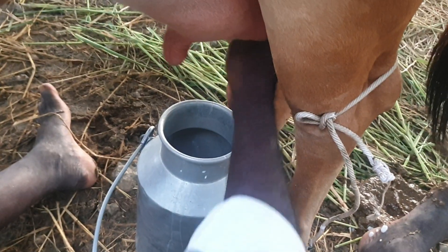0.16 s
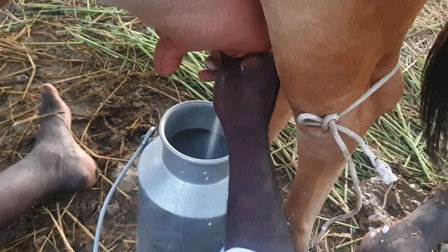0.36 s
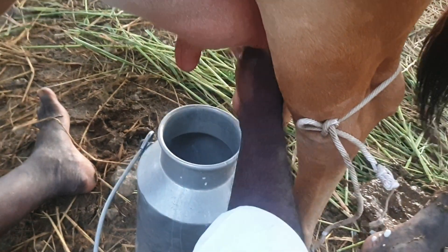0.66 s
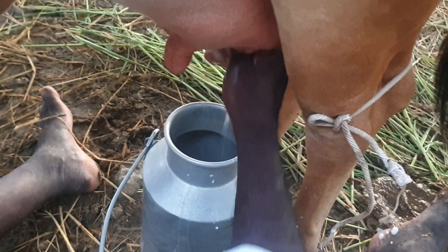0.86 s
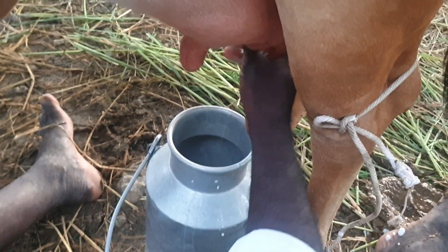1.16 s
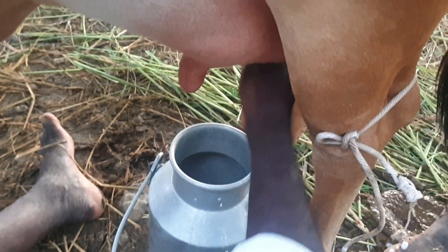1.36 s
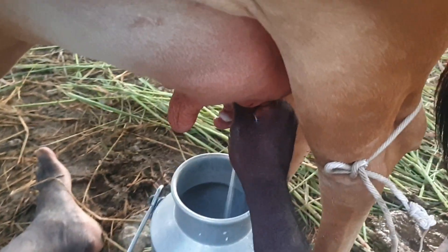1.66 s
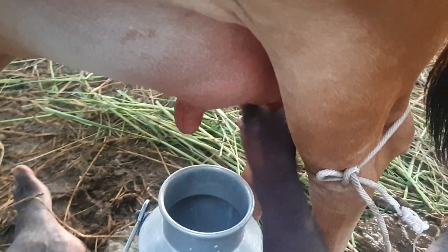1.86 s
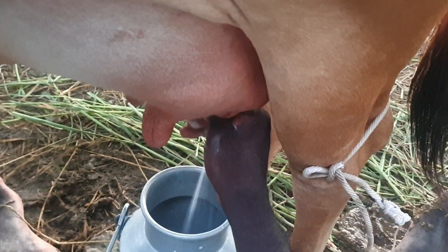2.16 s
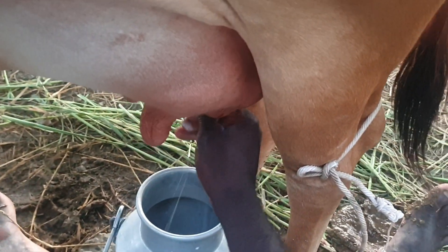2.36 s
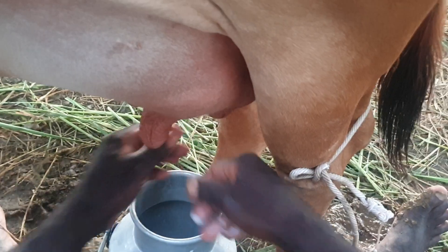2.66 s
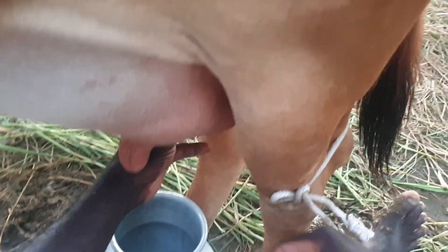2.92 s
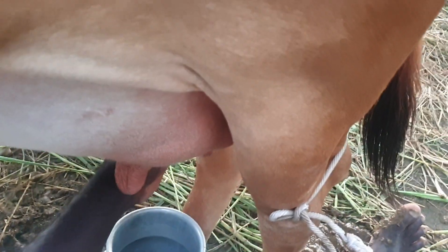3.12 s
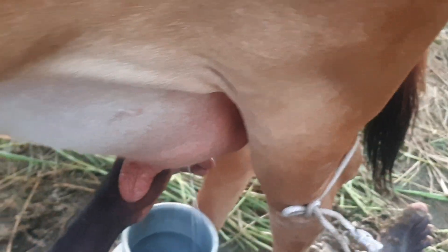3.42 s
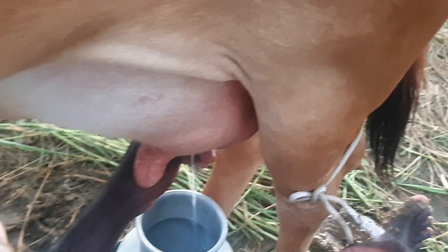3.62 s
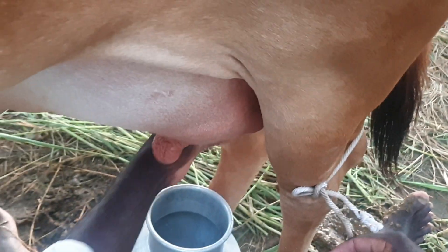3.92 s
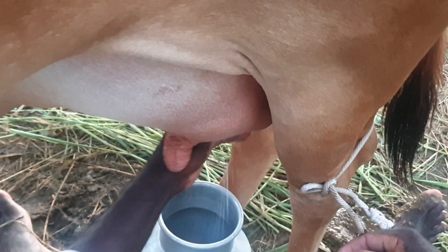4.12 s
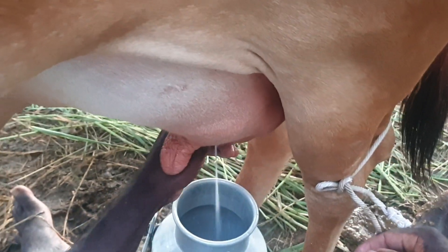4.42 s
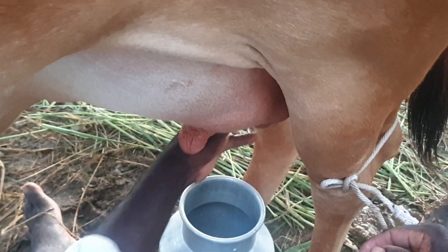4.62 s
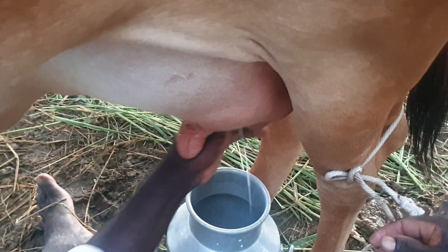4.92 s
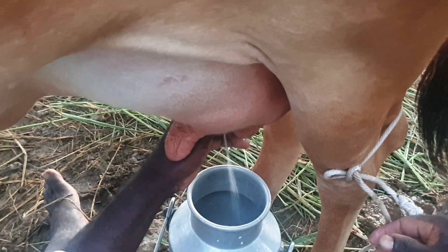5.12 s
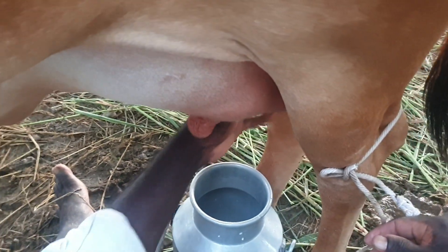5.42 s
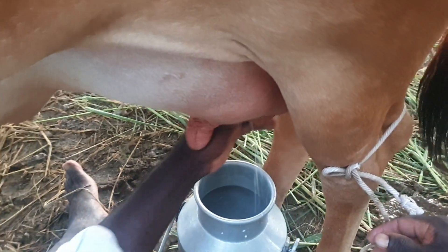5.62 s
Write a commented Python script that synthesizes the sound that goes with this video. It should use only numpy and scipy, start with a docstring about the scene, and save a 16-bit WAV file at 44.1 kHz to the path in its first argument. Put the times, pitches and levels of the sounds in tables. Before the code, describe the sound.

Jets of milk spurt into a metal can close to the microphone from the start, about two a second with short gaps, each a ringing patter with a hiss of spray and a little slosh. At about 0.6 seconds a finger knocks the microphone with a sharp thump, the loudest moment. The can's handle clinks lightly at 1.4 seconds. Insects sing steadily over a low outdoor rumble, with faint bird chirps scattered through the first four seconds. From about 2.4 seconds a distant engine chugs in, swelling and then speeding up around 4 seconds. The milking pauses briefly near 3 seconds, resumes at 3.5 and is strongest between 4.3 and 5.4. From 4.5 seconds the cow gives a soft, humming low that lasts to the end, near 5.8 seconds, with a thin whistle-like overtone rising above it from about 5 seconds.

```python
"""A cow is milked by hand in the open, with insects singing over a low rumble and birds calling.
From the start, jets of milk drum into a metal can and spray hisses off them. In the first second a
finger knocks the phone beside its left microphone port; then the can's handle clinks. A far engine
chugs in, draws closer and speeds up. Near the end, over more spurts, the cow lows and a thin,
whistle-like overtone rises above her hum."""
import sys
import numpy as np
from scipy import signal
from scipy.fft import rfft, irfft
from scipy.io import wavfile
from scipy.ndimage import uniform_filter1d

SR = 44100
rng = np.random.default_rng(int(sys.argv[2]) if len(sys.argv) > 2 else 0)


def int16_out(signal):
    """Quantize to a 16-bit WAV file."""
    q = np.round(np.clip(np.atleast_2d(signal).T, -1, 1) * 32767)
    wavfile.write(sys.argv[1], SR, q.astype(np.int16))


N = 254898
TIME = np.arange(N) / SR

# The two microphone ports. Each row: frequency in Hz, left minus right in dB for far sounds,
# the same for the nearby can, likeness from 0 to 1.
PORTS = [(60.5, 2.5, 2.5, .9), (203, 3.5, 3, 0.95), (391, 10.5, 8.5, 0.7), (1300, 7.5, 10.5, 0.2),
         (2400, 14, 8, 1), (4400, -2.5, 0.5, 0), (7250, -16.5, -6.5, 0.1), (8250, -18.5, -8, 0.05),
         (11060, -6.5, 1.5, 0), (15000, -2, -9.5, 0.05)]
# Faders of the background bed. Each row: time in seconds, then rumble, midrange hiss and insects in dB.
BED_LEVELS = [(0.0, -53, -61, -62.5), (0.14, -55.5, -73.5, -62), (0.53, -53.5, -60.5, -65),
              (0.76, -60, -76.5, -68), (1.56, -62.5, -77, -65), (1.82, -58.5, -76, -64),
              (2.75, -57, -77.5, -66), (3.25, -55.5, -74.5, -59.5), (3.72, -54, -65.5, -60),
              (4.12, -53, -75.5, -63), (4.33, -46.5, -62, -59), (4.49, -53, -52, -65),
              (4.65, -55.5, -78, -59.5), (5.07, -53.5, -69, -60.5), (5.55, -55.5, -68.5, -60),
              (5.78, -52.5, -64.5, -58.5)]
# Tone colours of the bed. Each row: frequency in Hz, relative spectral level in dB.
RUMBLE_EQ = [(15, -41), (25, -20.5), (49, -1.5), (92, -2.5), (202, -13.5), (246, -18.5), (485, -33),
             (600, -44), (780, -63), (1320, -120)]
MID_HISS_EQ = [(450, -7.5), (600, -8.5), (900, -11), (1530, -6), (2000, -8), (2500, -2), (3200, -12),
               (4400, -16), (6500, -22.5), (9000, -25)]
INSECT_EQ = [(4500, -28), (4850, -9.5), (5350, 0), (5650, -2.5), (6100, -20), (6600, -56), (7700, -22.5),
             (8250, -8.5), (8700, -23), (9800, -23.5), (10700, -14.5), (11500, -30.5)]
MIC_HISS_EQ = [(6000, -5.5), (9000, -5), (12000, 0), (16500, -3.5)]
# Exhaust pipe modes. Each row: frequency in Hz, time to fade 60 dB in seconds, gain in dB.
PIPE_MODES = [(84, 0.21, -13), (154, 0.055, -6), (231, 0.03, 4), (281, 0.061, -10)]
# Short bird notes. Each row: start and length in seconds, first and last pitch in Hz, level in dB.
CHIRPS = [(.16, .09, 4320, 4230, -74), (.7, .1, 2460, 2250, -78), (1.25, .09, 4600, 3800, -75),
          (1.9, .15, 2480, 2360, -79), (1.96, .07, 4270, 4180, -75), (2., .045, 4850, 4600, -73),
          (3.325, .04, 2460, 2760, -68), (3.365, .065, 2520, 2320, -68), (3.365, .1, 4880, 3900, -68),
          (3.62, .035, 2800, 2950, -69), (3.655, .075, 2620, 2500, -67), (4.02, .12, 2500, 2420, -70)]
COOS = [(3.17, 0.092, 464, 520, -69), (4.09, 0.112, 443, 495, -68.5)]
# The cow's low. Each row: time in seconds, pitch in Hz, level in dB, mouth opening in dB.
MOO = [(4.5, 147.2, -60, -30), (4.6, 155.5, -57.5, -37), (4.7, 166.5, -60, -19),
       (4.89, 168.4, -55.5, -14.5), (5.02, 173.4, -61, -7), (5.37, 170.1, -56.5, -8.5),
       (5.56, 169.6, -57, -12.5), (5.62, 176.6, -64.5, 0), (5.78, 170.7, -62, -7)]
# Colour of her open mouth. Each row: frequency in Hz, gain in dB.
MOUTH_EQ = [(500, -76), (860, 2), (1030, -9), (1200, -5), (1500, -28), (2000, -18), (2500, -9)]
# The thin overtone above her low. Each row: time in seconds, pitch in Hz, level in dB.
OVERTONE = [(4.95, 1690, -78.5), (5.05, 1834, -65.5), (5.13, 1960, -61), (5.2, 2095, -60.5),
            (5.33, 2010, -55), (5.45, 2090, -54.5), (5.54, 2119, -58.5), (5.62, 1990, -75)]
# Finger knocks. Each row: time in seconds, dip level in dB and width in ms, click level in dB,
# swing level in dB, pitch in Hz and length in ms, left minus right in dB.
KNOCKS = [(0.0615, -28.5, 0.31, -46, -30, 69, 17, 5.5), (.2315, -34.5, 1., -53, -54, 60, 15, 17),
          (0.615, -41, 0.55, -26.5, -34.5, 150, 13, 8), (.62735, -1, .24, -21, -7.3, 45, 20, 33),
          (0.6566, -21.5, 0.14, -30, -36, 62.4, 11, 10)]
# Handle modes. Each row: frequency in Hz, gain in dB, time to fade 60 dB in seconds.
HANDLE_MODES = [(1290, -13, 0.38), (1500, -8.5, 0.19), (2070, -12.5, 0.42), (2476, -11, 0.23),
                (2790, -5.5, 0.38), (3400, -19.5, 0.26), (3880, -29, 0.24)]
# Handle clinks and fine spits of spray. Each row: start in seconds, level in dB.
CLINKS = [(1.391, -55.5)]
SPITS = [(0.0765, -35.5), (0.3391, -40), (0.9901, -43), (3.489, -46), (3.8367, -41), (4.305, -34.5),
         (4.529, -26), (4.572, -26.5), (4.6422, -42), (5.118, -36), (5.1706, -36), (5.215, -30),
         (5.2944, -45)]
# The can's wall modes. Each row: frequency in Hz, bandwidth in Hz, gain in dB.
CAN_MODES = [(1266, 12, -0.5), (1655, 190, 1), (1893, 150, 6), (2390, 87, 7), (2966, 33, 1), (3700, 200, 5),
             (4300, 640, 12.5)]
# Heavy drops on the can. Each row: start in seconds, level in dB, strongest ring in Hz.
SPLATS = [(0.051, -40, 2980), (0.062, -38.5, 2770), (0.138, -41.5, 1290), (0.3565, -59, 3700),
          (0.3806, -47, 1790), (0.5019, -38, 1800), (0.541, -47, 1720), (0.9782, -38.5, 4370),
          (1.115, -46, 1260), (1.2221, -41.5, 1056), (1.6862, -40, 3580), (1.7508, -41, 2370),
          (2.2981, -43.5, 2320), (2.3984, -48.5, 4000), (3.5466, -44.5, 1280), (4.35, -37.5, 5200),
          (4.361, -32, 4300), (4.371, -36, 2950), (4.392, -35.5, 1960), (4.4112, -34.5, 2980),
          (4.4519, -32.5, 1320), (4.466, -38, 2780), (4.4705, -29, 2900), (4.4849, -29.5, 1230),
          (4.492, -32, 2780), (4.519, -36, 1220), (4.563, -43, 2980), (5.149, -45, 1330),
          (5.2127, -35, 2070), (5.2211, -26.5, 2040), (5.2924, -33.5, 1880), (5.3261, -34, 1210),
          (5.7173, -38, 690), (5.7588, -36.5, 770)]
# Tone colours of the milk. Each row: frequency in Hz, relative spectral level in dB.
SPLASH_EQ = [(780, -36), (900, -28), (1150, -0.5), (1900, -23), (2120, -2.5), (2350, -6), (2800, -3),
             (3300, -4.5), (3700, -21.5), (4800, 1.5), (5600, 5.5), (6300, -4), (7800, -15), (8600, -18)]
SPRAY_EQ = [(7000, -9), (8300, -10), (10000, -5.5), (13300, 2), (16500, 0.5)]
SLOSH_EQ = [(150, -10.5), (250, -2), (500, 1), (800, -10), (1000, -32.5)]
# Spurts of milk. Each row: moment of full flow, rise, hold and fall in seconds, spray level in dB,
# then drumming and slosh in dB relative to the spray.
SPURTS = [(.0, .01, .06, 0.038, -68, 1, 9.5), (0.075, 0.041, 0.065, 0.021, -55, 2.5, -2),
          (0.223, .03, 0.07, .08, -69, 3, -3), (.365, 0.043, 0.15, 0.12, -51, 3, -3),
          (0.919, 0.014, .05, 0.046, -65, 0.5, 0), (0.972, 0.022, .16, 0.098, -60, 5.5, -10),
          (1.205, .012, 0.033, 0.069, -73, 7.5, 6.5), (1.402, 0.035, 0.049, 0.071, -72, 4.5, -23),
          (1.543, 0.02, 0.028, .04, -67, 0.5, -4), (1.61, 0.03, 0.19, 0.076, -60.5, 4, -5),
          (2.243, 0.072, 0.085, 0.07, -58, 2.5, -5.5), (2.366, 0.059, 0.038, 0.043, -61.5, 3, -8),
          (2.713, 0.053, 0.071, 0.13, -71.5, 3, 4), (3.498, 0.016, 0.047, 0.072, -64.5, 0.5, -1),
          (3.676, 0.12, 0.1, .05, -63, -3.5, 2), (3.828, 0.074, 0.049, 0.094, -61.5, 2.5, 0),
          (4.316, 0.057, 0.13, .08, -56.5, 0, -3.5), (4.449, 0.11, 0.14, 0.13, -52.5, 4.5, -6.5),
          (5.006, .015, 0.082, 0.042, -64, 1, 6.5), (5.118, 0.013, 0.036, .04, -55.5, 6, -25),
          (5.166, 0.024, 0.12, 0.18, -51.5, 3.5, -2.5), (5.616, 0.016, .07, .06, -67, 6, 4),
          (5.743, 0.059, 0.049, 0.078, -66, 8, 9)]


def undb(db):
    return 10 ** (np.asarray(db) / 20)


def unit(x):
    return x / np.sqrt(np.mean(x ** 2))


def curves(rows):
    """Columns of a table joined by straight lines in time."""
    times, *columns = np.transpose(rows)
    return [np.interp(TIME, times, column) for column in columns]


def on_hz(rows, hz, column=1):
    """One column of a table read on a log-frequency axis."""
    rows = np.array(rows)
    return np.interp(np.log(hz + 1), np.log(rows[:, 0]), rows[:, column])


def colour(x, eq):
    """Apply an EQ curve, silent beyond its ends; RMS 1."""
    hz = np.fft.rfftfreq(N, 1 / SR)
    inside = (hz > eq[0][0]) & (hz < eq[-1][0])
    return unit(irfft(rfft(x) * undb(on_hz(eq, hz)) * inside, N))


def ring(x, hz, t60):
    """One mode: a decaying sine for every push."""
    r, turn = np.exp(-np.log(1000) / (t60 * SR)), 2 * np.pi * hz / SR
    return signal.lfilter([0, r * np.sin(turn)], [1, -2 * r * np.cos(turn), r * r], x)


def ring_time(width_hz):
    """Seconds for a mode of this bandwidth to fade 60 dB."""
    return np.log(1000) / np.pi / width_hz


def walk(rate):
    """Smooth random drift, rate new values a second; RMS 1."""
    hold = int(SR / rate)
    steps = np.repeat(rng.standard_normal(N // hold + 1), hold)
    return unit(uniform_filter1d(uniform_filter1d(steps, hold), hold)[:N])


def patter(rate, scatter_db):
    """Random clicks of either sign; a few are much bigger than the rest."""
    hit = rng.random(N) < rate / SR
    return hit * rng.standard_normal(N) * undb(scatter_db * rng.exponential(size=N))


def ports(make, wide, near):
    """Two ports of unlike colour hear nearly the same bass but mostly their own treble."""
    hz = np.fft.rfftfreq(N, 1 / SR)
    like = np.clip(1 - wide * (1 - on_hz(PORTS, hz, column=3)), 0, 1)
    mid, side = rfft(make()) * np.sqrt(1 + like), rfft(make()) * np.sqrt(1 - like)
    tilt = undb(on_hz(PORTS, hz, column=2 if near else 1) / 2)
    norm = 2 / (tilt + 1 / tilt) / np.sqrt(1 + like)
    return irfft(np.array([(mid + side) * tilt, (mid - side) / tilt]) * norm, N)


def pan(x, left_db):
    return x * undb(np.array([[left_db], [-left_db]]) / 2)


def add(out, start, sound):
    i = int(start * SR)
    out[:, i:i + sound.shape[1]] += sound[:, :N - i]


def background_bed():
    """Rumble, shimmering insects, microphone hiss and a faint midrange hiss that swells with spurts."""
    shimmer_db = 1.5 * walk(6), 1.5 * walk(8), 1.2 * walk(12)
    gains = undb(np.array(curves(BED_LEVELS)) + shimmer_db)
    layers = [*zip((RUMBLE_EQ, MID_HISS_EQ, INSECT_EQ), gains), (MIC_HISS_EQ, undb(-79))]

    def bed():
        return sum(colour(rng.standard_normal(N), eq) * gain for eq, gain in layers)
    return ports(bed, wide=1, near=False)


def far_engine(start=2.37, idle_hz=13.02, fast_hz=16.2, speed_up_s=(3.75, 4.7)):
    """Each firing of a slow single cylinder thumps the pipe, a little uneven in force and timing."""
    since = np.maximum(TIME - start, 0)
    cycles = np.cumsum(np.interp(TIME, speed_up_s, (idle_hz, fast_hz)) * (since > 0)) / SR
    level_db = -47.5 - 16.5 * np.exp(-since / .86)  # swells as it closes in
    fired = np.flatnonzero(np.diff(np.floor(cycles)))
    timing, force = rng.standard_normal((len(fired), 2)).T
    jittered = np.clip(fired + (.003 * SR * timing).astype(int), 0, N - 1)
    pushes = np.zeros(N)
    pushes[jittered] = undb(level_db[fired] + 2.5 * force)
    puffs = np.convolve(pushes, np.hanning(130) / 65)[:N]  # softened to 3 ms
    return pan(sum(undb(db) * ring(puffs, hz, t60) for hz, t60, db in PIPE_MODES), left_db=4.6)


def bird_note(start, length, first_hz, last_hz, db, bend=1.5, arch_db=6):
    """Time, pitch and level rows of one note: it glides fastest late and is loudest in the middle."""
    progress = np.linspace(0, 1, num=9)
    hz = first_hz + (last_hz - first_hz) * progress ** bend
    return np.transpose([start + length * progress, hz, db - arch_db * (2 * progress - 1) ** 2])


def birds_and_cow_overtone():
    """Near-sine tones blurred by echoes: raspy chirps, soft coos and a thin overtone over the low."""
    calls = [(OVERTONE, .35)]
    calls += [(bird_note(*row), .75) for row in CHIRPS]
    calls += [(bird_note(*row), .25) for row in COOS]
    out, waver, rasp = 0, walk(120), walk(300)
    for call, rough in calls:
        hz, db = curves(call)
        gate = np.clip(np.minimum(TIME - call[0][0], call[-1][0] - TIME) / .0013, 0, 1)
        tone = np.sqrt(2) * np.sin(2 * np.pi * np.cumsum(hz * (1 + .02 * rough * waver)) / SR)
        left_db = 2.5 if call is OVERTONE else on_hz(PORTS, call[1][1])
        out = out + pan(gate * undb(db) * (1 + rough * rasp) * tone, left_db)
    echoes = rng.standard_normal((2, 3000)) * undb(-60 * TIME[:3000] / .15)
    return out + undb(-30) * signal.fftconvolve(out, echoes, axes=1)[:, :N]


def cow():
    """A low hum; upper partials, a little hoarse, come out as the mouth opens."""
    hz, level_db, mouth_db = curves(MOO)
    phase = 2 * np.pi * np.cumsum(hz * (1 + .007 * walk(30))) / SR
    hum = np.sin(phase) + undb(-18.5) * np.sin(2 * phase)
    upper = sum(undb(on_hz(MOUTH_EQ, k * hz) + 2.8 * walk(13)) * np.sin(k * phase) for k in range(3, 13))
    hoarseness = 1 + .5 * walk(150)
    voice = np.sqrt(2) * undb(level_db) * (hum + undb(mouth_db) * upper * hoarseness)
    fade_in = np.clip((TIME - MOO[0][0]) / .061, 0, 1)
    return pan(voice * fade_in, left_db=7.6)


def finger_knocks(lead_s=.004):
    """A sharp pressure dip and a click at the left port; the casing swings back, slowing as it settles."""
    out = np.zeros((2, N))
    t = np.arange(4000) / SR - lead_s
    after = np.maximum(t - .0004, 0)
    for moment, dip_db, dip_ms, click_db, swing_db, hz, swing_ms, left_db in KNOCKS:
        dip = -undb(dip_db) * np.exp(-np.abs(t * 1000 / dip_ms) ** 1.3)
        click = undb(click_db) * np.cos(2 * np.pi * 2600 * t) * np.exp(-(t / .00035) ** 2)
        turns = hz * after + .6 * (1 - np.exp(-after / .0053))
        swing = undb(swing_db) * np.exp(-(after * 1000 / swing_ms) ** 1.7) * np.sin(2 * np.pi * turns)
        thump = dip + swing
        add(out, moment - lead_s, np.array([thump - click, thump * undb(-left_db)]))
    return out


def handle_clink():
    """The metal handle is struck and its modes ring out."""
    out, t = np.zeros((2, N)), TIME[:SR // 2]
    clink = sum(undb(db - 60 * t / t60) * np.sin(2 * np.pi * hz * t) for hz, db, t60 in HANDLE_MODES)
    for start, db in CLINKS:
        add(out, start, pan(undb(db) * clink, left_db=13))
    return out


def spray_spits():
    """Fine spray spits in tiny bursts of bright hiss."""
    out, t = np.zeros((2, N)), TIME[:3000]
    for start, db in SPITS:
        spit = np.diff(rng.standard_normal(len(t) + 3), 3) * np.exp(-t / .0029)
        add(out, start, pan(undb(db) * spit / np.abs(spit).max(), left_db=-8))
    return out


def heavy_drops():
    """Each drop gives a crack, a short ring at the spot struck, and the whole can behind it."""
    out, t = np.zeros((2, N)), TIME[:3000]
    can = sum(undb(db) * np.sin(2 * np.pi * hz * t) * np.exp(-np.pi * width * t)
              for hz, width, db in CAN_MODES)
    for start, db, hz in SPLATS:
        burst = rng.standard_normal(len(t)) * np.exp(-t / .0006)
        crack = signal.lfilter(*signal.butter(4, min(4 * hz, 5000), fs=SR), burst)
        spot = np.sin(2 * np.pi * hz * t) * np.exp(-t / (.003 + 2.5 / hz))
        add(out, start, pan(undb(db) * (.4 * spot + .092 * can + .84 * crack), left_db=6.9))
    return out


def milk_flow(rise_db=18.5, sag_db_per_s=23, fall_db=(19.5, 17, 10)):
    """Gains of spray, drumming and slosh: a spurt builds, weakens while the hand holds and falls away."""
    power = np.zeros((3, N))
    for full, rise, hold, fall, spray_db, drum_db, slosh_db in SPURTS:
        levels_db = spray_db + np.array([[0], [drum_db], [slosh_db]])
        attack = rise_db * np.maximum(full - TIME, 0) / rise
        sag = sag_db_per_s * np.clip(TIME - full, 0, hold)
        release = np.outer(fall_db, np.maximum(TIME - full - hold, 0) / fall)
        power += undb(levels_db - attack - sag - release) ** 2
    return np.sqrt(power)


def milk_jets():
    """Drops patter on the can: its walls and air ring, froth pops, milk sloshes and spray hisses."""
    gains = milk_flow()
    surge = undb(2.22 * walk(30) + 1.1 * walk(11))
    bubble_hz = 1000 * 2 ** np.linspace(0, 2.3, num=12)

    def stream():
        drops = patter(rate=5000, scatter_db=2.2) * surge
        walls = unit(sum(undb(db) * np.sqrt(width) * ring(drops, hz, ring_time(width))
                         for hz, width, db in CAN_MODES))
        froth = unit(sum(ring(patter(120, 3.3), hz, 25 / hz) * np.sqrt(hz) for hz in bubble_hz))
        splash = colour(unit(drops) + .6 * froth, SPLASH_EQ)
        drumming = undb(-1) * walls + undb(-7) * splash
        gulps = patter(rate=900, scatter_db=1.23) * surge
        can_air = unit(ring(gulps, hz=262, t60=ring_time(width_hz=25)))
        slosh = colour(gulps, SLOSH_EQ) + undb(.95) * can_air
        spray = colour(patter(rate=8700, scatter_db=2) * surge, SPRAY_EQ)
        return np.sum(gains * [spray, drumming, slosh], axis=0)
    return ports(stream, wide=.93, near=True)


def scene():
    """Close milking in front, the animals and the outdoors behind."""
    milking = milk_jets() + heavy_drops() + spray_spits() + handle_clink()
    return milking + finger_knocks() + cow() + birds_and_cow_overtone() + far_engine() + background_bed()


def record(dry):
    """The phone cuts the top steeply above 15.8 kHz."""
    lowpass = signal.ellip(10, .2, 60, 15800, fs=SR, output="sos")
    return np.clip(signal.sosfilt(lowpass, dry), -1, 1)


dry = scene()
out = record(dry)
int16_out(out)
```